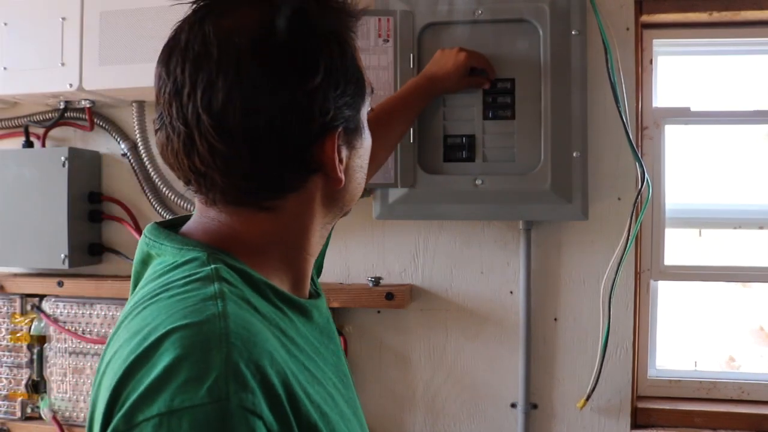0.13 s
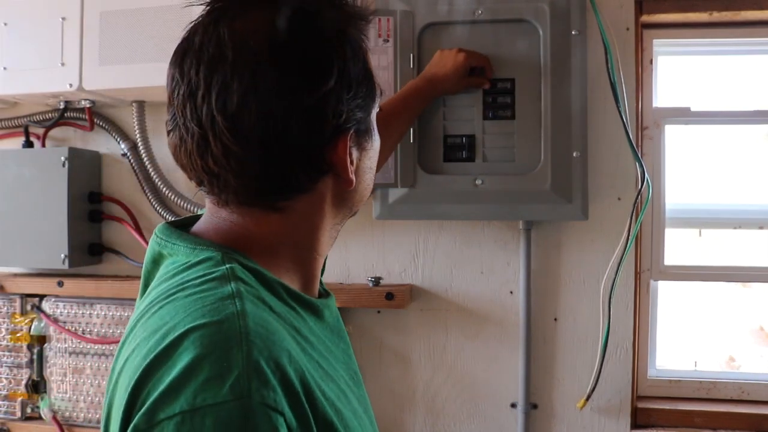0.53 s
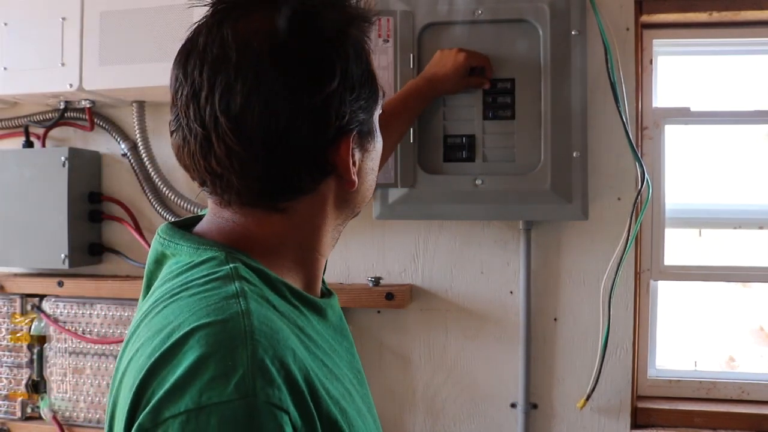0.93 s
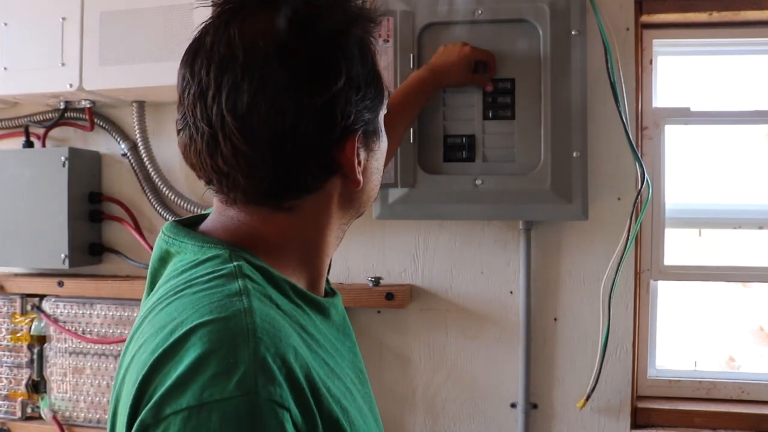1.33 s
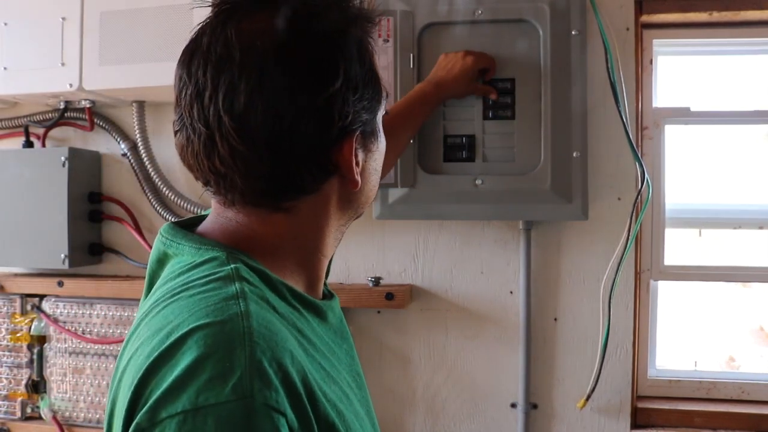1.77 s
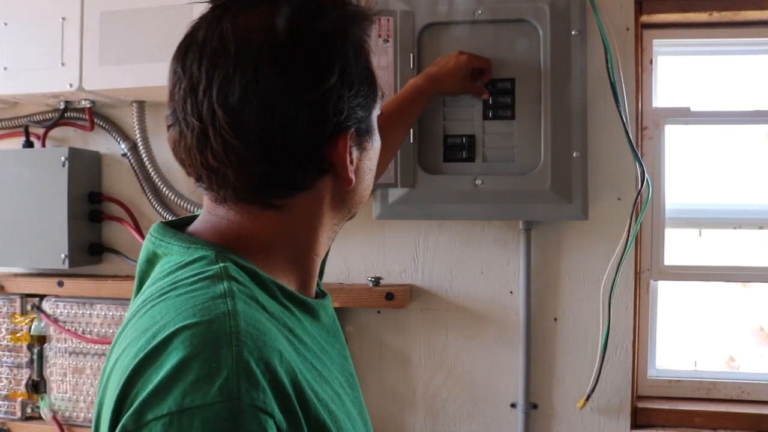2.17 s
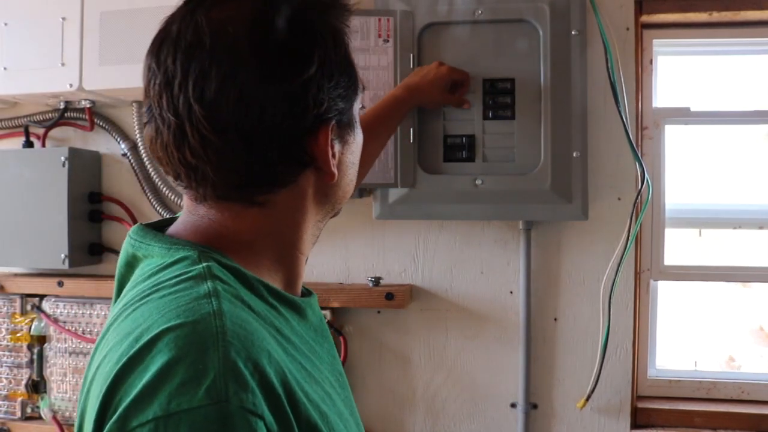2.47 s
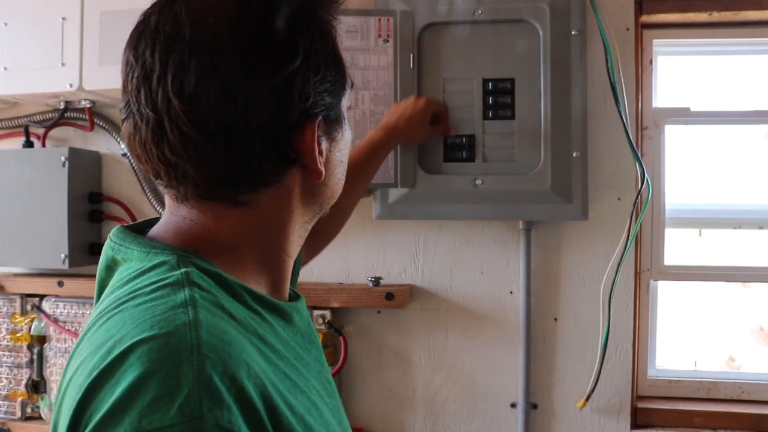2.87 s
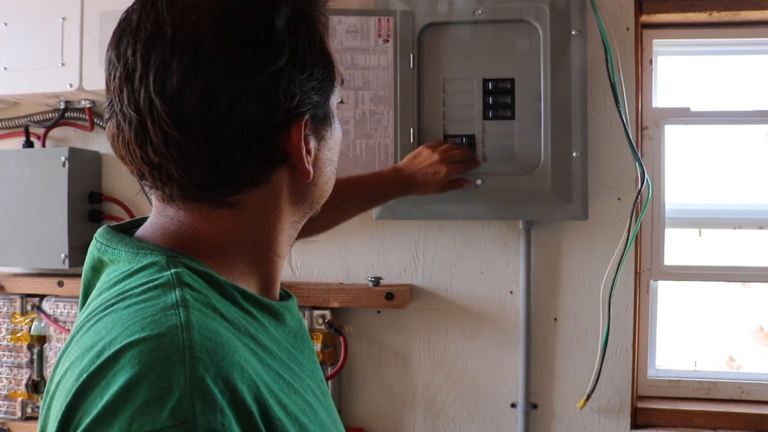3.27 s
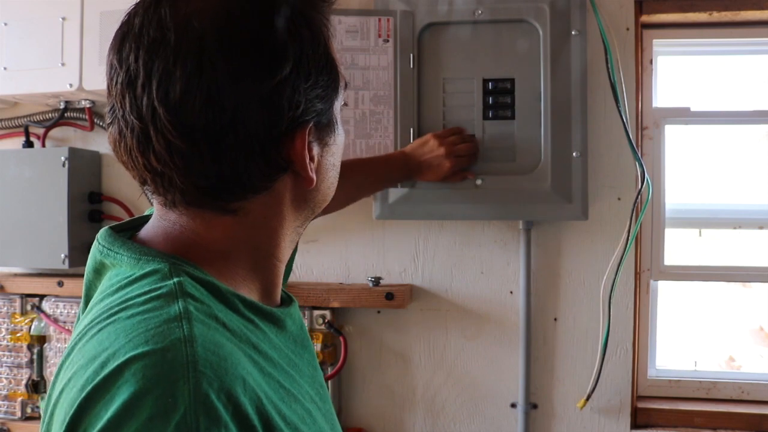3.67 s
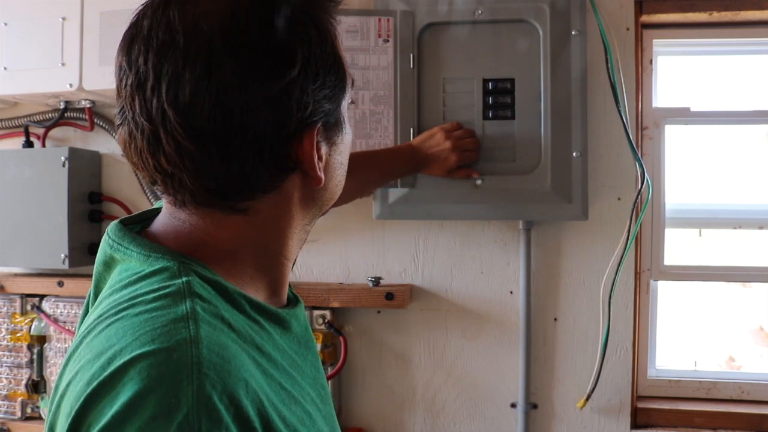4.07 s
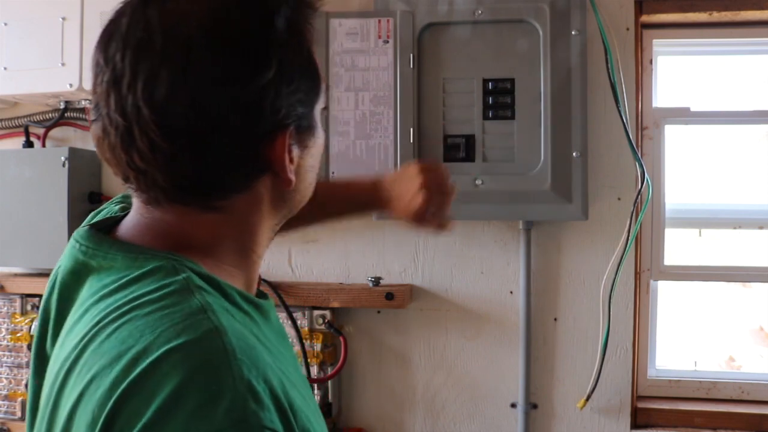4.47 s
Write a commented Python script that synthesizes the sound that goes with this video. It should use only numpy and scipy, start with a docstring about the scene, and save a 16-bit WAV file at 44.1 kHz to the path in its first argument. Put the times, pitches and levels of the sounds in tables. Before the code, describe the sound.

A quiet small shed: low still air, steady microphone hiss and a very faint, wavering high whine. From 0.2 to 0.8 s a sleeve rustles faintly, with a barely audible finger click near 0.4. At about 1.06 s a breaker snaps off, bright and sharp, preceded by a light handle click and followed by a soft hand bump on sheet steel. A second snap, slightly weaker and crisper, comes at 1.76 s. Each rings briefly around the shed, ducking the level before the tail swells back. Quiet follows, with a tiny click near 2.96 s, a very faint bump at 3.5 and more rustling from 3.6. Around 4.0 s small clicks and creaks strain the main handle; at 4.13 s it slams off, by far the loudest, a heavy crack with fast rattling and dull steel thumps until about 4.3. A lighter knock on the panel door lands at 4.59, right at the end.

```python
"""Breakers switched off in a shed

In a small shed, two branch breakers and then the heavy main breaker are snapped off by hand in a steel panel.
Handles, breakers and sheet steel are struck decaying sines with short cracks; noise echoes make the shed ring on.
Still air, a rustling sleeve and a faint whine lie behind; at last the hand knocks the panel door.
The recorder's limiter ducks at each snap and lets the tail swell back over the microphone hiss."""
import sys
import numpy as np
from scipy import signal
from scipy.fft import rfft, irfft, next_fast_len
from scipy.io import wavfile
from scipy.ndimage import uniform_filter1d, minimum_filter1d

SR = 44100
rng = np.random.default_rng(int(sys.argv[2]) if len(sys.argv) > 2 else 0)


def wav_record(signal):
    """Record a signal, one row per channel, as 16-bit PCM in the file named by sys.argv[1]."""
    frames = np.transpose(np.atleast_2d(signal))
    bounded = np.clip(frames, -1, 1)
    # unit amplitude maps onto the largest positive 16-bit level
    quanta = np.round(bounded * 32767).astype(np.int16)
    wavfile.write(sys.argv[1], SR, quanta)


N = 202931
TIME = np.arange(N) / SR
SECOND = TIME[:SR]
CUTOFF_HZ = 15900  # top of the recorder's band


def from_db(db):
    """Decibels to an amplitude factor."""
    return 10 ** (np.asarray(db) / 20)


def rms_one(x):
    """Scale a sound to rms 1."""
    return x / np.sqrt(np.mean(x ** 2) + 1e-20)


def at_hz(points, hz):
    """Read a table on a log-frequency axis."""
    known_hz, values = np.transpose(points)
    return np.interp(np.log(np.maximum(hz, 1)), np.log(known_hz), values)


def add(track, s, sound):
    """Lay a sound into the track at its time in seconds."""
    start = round(s * SR)
    track[start:start + len(sound)] += sound[:N - start]


def dying(t60):
    """One second of exponential decay, losing 60 dB in t60 seconds."""
    return np.exp(-np.log(1000) * SECOND / t60)


def ring(modes):
    """Struck modes: decaying sines, neighbours swinging opposite ways."""
    total = np.zeros(SR)
    for k, (hz, db, t60) in enumerate(modes):
        swing = np.sin(2 * np.pi * hz * SECOND)
        total += (-1) ** k * from_db(db) * dying(t60) * swing
    return total


def soften(x, hz):
    """A softer contact lasts longer and loses its treble: a first-order low-pass."""
    return signal.sosfilt(signal.butter(1, min(hz, CUTOFF_HZ), fs=SR, output="sos"), x)


def noise(spectrum):
    """Steady noise of a given colour, rms 1."""
    size = next_fast_len(N)
    colour = from_db(at_hz(spectrum, np.fft.rfftfreq(size, 1 / SR)))
    white = rng.standard_normal(size)
    return rms_one(irfft(rfft(white) * colour, size)[:N])


def drift(hz):
    """Slow random wandering below a frequency, rms 1."""
    low_pass = signal.butter(2, hz, fs=SR, output="sos")
    slow = signal.sosfilt(low_pass, rng.standard_normal(N + SR))
    return rms_one(slow[SR:])  # the filter has settled by then


# Still air in the shed. Each row: frequency in Hz, relative density in dB per Hz.
AIR_COLOUR = [(25, -20.5), (87, 0), (150, -3.5), (300, -7.5), (600, -6.5), (750, -10.5), (1700, -14.5),
              (3500, -19), (8000, -44.5)]


def still_air(level_db=-60):
    """The quiet of the shed: steady noise, strongest in the bass."""
    return from_db(level_db) * noise(AIR_COLOUR)


# A faint high whine, pitch joined by straight lines. Each row: time in seconds, frequency in Hz.
WHINE_PITCH = [(1.3, 1801), (2.1, 1922)]


def whine(level_db=-69, fade_db_per_s=2, waver_hz=9.2):
    """A thin sine that glides up once, wavers in pitch and fades."""
    pitch_hz = np.interp(TIME, *np.transpose(WHINE_PITCH))
    pitch_hz = pitch_hz + waver_hz * drift(hz=23)
    sine = np.sqrt(2) * np.sin(2 * np.pi * np.cumsum(pitch_hz) / SR)  # rms 1
    return from_db(level_db - fade_db_per_s * TIME) * sine


# Sleeve and fingers sliding. Each row: frequency in Hz, relative density in dB per Hz.
RUSTLE_COLOUR = [(60, -10.5), (250, 7.5), (600, 1.5), (1500, -3.5), (3300, -4), (6000, -20.5), (16000, -46)]
# The arm reaches for the breakers. Each row: start in seconds, end in seconds, level in dB before the unevenness.
REACHES = [(0.197, 0.795, -63), (1.3, 1.699, -65.5), (3.608, 4.6, -62)]


def rustle(rise_db_per_s=42, fall_db_per_s=22.5, uneven_db=3.5):
    """Sliding friction is coloured noise that swells and fades unevenly with each reach of the arm."""
    swells_db = []
    for start, end, db in REACHES:
        before_s, after_s = np.maximum(start - TIME, 0), np.maximum(TIME - end, 0)
        swells_db.append(db - rise_db_per_s * before_s - fall_db_per_s * after_s)
    level_db = np.max(swells_db, axis=0) + uneven_db * drift(hz=12)
    return from_db(level_db) * noise(RUSTLE_COLOUR)


def background():
    """Everything behind the breakers: air, rustle and whine."""
    return still_air() + rustle() + whine()


# Dense ringing of panel, plywood wall and shed. Each row: frequency in Hz, echo gain in dB for what is sent in.
SHED_GAIN = [(40, -19), (90, 2), (180, -1), (320, 9.5), (550, 6), (1000, 9), (2000, 3.5), (3000, 4),
             (5000, 3.5), (9000, -1), (15000, -16.5)]
# How long that ringing lasts. Each row: frequency in Hz, t60 in seconds.
SHED_T60 = [(80, 0.96), (160, 0.38), (300, 0.48), (550, 0.35), (1500, 0.31), (3000, 0.3), (5500, 0.25),
            (9000, 0.2), (14000, .23)]


def shed(x, build_s=0.0013, build_cycles=0.96):
    """Dense echoes die band by band; the lows build up later and mostly last longer."""
    response, edges = np.zeros(SR), np.geomspace(35, 18000, 23)
    white = rng.standard_normal((2, SR))
    for k, (low, high) in enumerate(zip(edges, edges[1:])):
        hz = np.sqrt(low * high)
        band_pass = signal.butter(2, [low, high], "band", fs=SR, output="sos")
        band = signal.sosfilt(band_pass, white[k % 2])
        build_up = 1 - np.exp(-SECOND / (build_s + build_cycles / hz))
        tail = band * dying(at_hz(SHED_T60, hz)) * build_up
        even_gain = np.sqrt(2 * (high - low) / SR / np.sum(tail ** 2))  # energy in step with bandwidth
        response += from_db(at_hz(SHED_GAIN, hz)) * tail * even_gain
    return signal.fftconvolve(x, response)[:N]


# Lasting tones of the steel box, also set off by the breakers.
# Each row: frequency in Hz, level in dB within the ring, t60 in seconds.
BOX = [(113.4, -58, .9), (167.7, -53, .5), (245.8, -48.5, 0.61), (290, -42.5, 0.36), (387.5, -50.5, 0.22),
       (663, -51.5, 0.13), (987, -43.5, 0.28), (1157, -52, 0.2), (1407, -54, 0.35), (1470, -53.5, 0.68)]
# The flexing cover and door. Each row: frequency in Hz, level in dB within the thump, t60 in seconds.
COVER = [(172.9, -20.5, 0.068), (303, -9, 0.031), (430, -4, 0.0087), (524, -8, 0.038), (1000, -7, 0.0057),
         (1660, -9, .02), (2960, -2, 0.027)]
# The hand bumping the sheet steel, also when it follows a handle over.
# Each row: time in seconds, strike level in dB, brightness in Hz.
KNOCKS = [(1.113, -7.5, 1400), (1.139, -14, 700), (3.536, -36.5, 508), (4.0168, -14, 900),
          (4.026, -19, 900), (4.196, 7, 402), (4.255, 2, 292), (4.5925, -10, 2525)]


def knocks(scuff_db=-13, scuff_t60=0.057, box_db=10):
    """The hand thumps the cover and sets the box ringing, with a brief scuff of skin."""
    out = np.zeros(N)
    steel = ring(COVER) + from_db(box_db) * ring(BOX)
    for s, db, bright_hz in KNOCKS:
        scuff = from_db(scuff_db) * rng.standard_normal(SR) * dying(scuff_t60)
        add(out, s, from_db(db) * soften(steel + scuff, bright_hz))
    return out


# A finger presses a handle and it clicks through its slack.
# Each row: time in seconds, ring level in dB, crack in dB against the ring, name of the part that rings.
PRESSES = [(0.37, -45, 9, "handle"), (1.022, -32, 19, "handle"), (1.73, -29.5, 17, "middle"),
           (2.96, -48.5, 15.5, "main"), (3.9755, -33.5, 19.5, "handle"), (4.0152, -32.5, 17, "main")]


def presses(bright_hz=4000):
    """One light click for each press on a handle."""
    for s, db, crack_db, name in PRESSES:
        yield s, db, bright_hz, crack_db, name


def creak(from_s=3.981, to_s=4.009, count=4, level_db=-35, uneven_db=1.5, crack_db=18.5, bright_hz=2500):
    """The stiff main handle is forced over in small slips, unevenly spaced and unevenly strong."""
    gap_s = (to_s - from_s) / count
    for k in range(count):
        s = from_s + gap_s * (k + rng.random())
        db = level_db + uneven_db * rng.standard_normal()
        yield s, db, bright_hz, crack_db, "main"


RATTLE_FROM_S, RATTLE_GAP_S, RATTLE_BRIGHT_HZ = 4.1675, 0.038, 4130
RATTLE_DB, RATTLE_LOSS_DB = 5, 13.5  # first touch; loss per touch
RATTLE_CRACK_DB, RATTLE_DRYING_DB = 22, 4  # first crack against its ring; later touches ring less, tick more
CHATTER_S, CHATTER_LOSS_DB = 0.006, 6  # typical spacing and loss per bounce


def rattle(count=5, size=3, uneven=0.06):
    """The main breaker rattles in its mount: weaker, less regular touches, each chattering a few times."""
    for k in range(count):
        s = RATTLE_FROM_S + RATTLE_GAP_S * k * (1 + uneven * rng.uniform(-1, 1))
        crack_db = RATTLE_CRACK_DB + k * RATTLE_DRYING_DB
        for bounce in range(size):
            db = RATTLE_DB - k * RATTLE_LOSS_DB - bounce * CHATTER_LOSS_DB
            yield s, db, RATTLE_BRIGHT_HZ, crack_db, "main"
            s += CHATTER_S * rng.uniform(0.5, 2)


LATCH_LEAD_S, LATCH_CRACK_DB = 0.0029, 5.5  # the latch lets go just before the snap
REBOUND_S, REBOUND_CRACK_DB = 0.005, 8.5  # the contact arm bounces once off its stop
# A breaker snaps off. Each row: time in seconds, snap level in dB, brightness in Hz, crack in dB against the ring,
# latch in dB against the snap, rebound in dB against the snap, name of the breaker.
FLIPS = [(1.0641, 3, 11800, 12.5, -16, -12, "upper"), (1.7615, -1.5, 13000, 17, -17, -6, "middle"),
         (4.1323, 18.5, 4500, 12.5, -41, -3, "main")]


def flips():
    """The latch lets go, the spring slams the contacts open and the arm rebounds."""
    for s, db, bright_hz, crack_db, latch_db, rebound_db, name in FLIPS:
        yield s - LATCH_LEAD_S, db + latch_db, bright_hz, LATCH_CRACK_DB, name
        yield s, db, bright_hz, crack_db, name
        yield s + REBOUND_S, db + rebound_db, bright_hz, REBOUND_CRACK_DB, name


def crack(order=6, scatter=0.55, longest_s=0.0005):
    """A click bouncing about inside a small case: all pitches alike, smeared over a few milliseconds."""
    x = signal.unit_impulse(SR // 10)
    lags = np.ceil(rng.uniform(0.14, 1, order) * longest_s * SR).astype(int)
    for lag in lags:
        loop = np.r_[1, np.zeros(lag - 1), -scatter]
        x = signal.lfilter(loop[::-1], loop, x)  # all-pass echo
    return x


# What a plastic handle and each breaker ring with, by name, mount and case first, thin springs last.
# Each row: frequency in Hz, level in dB within the ring, t60 in seconds.
BREAKERS = { "handle": [(550, -15.5, .04), (1300, -11.5, 0.044), (2650, -6.5, 0.0083), (3400, -7, 0.011),
            (3850, -4, 0.026), (4550, -2.5, .01)], "upper": [(87.7, -45.5, 0.95), (185, -25, .06),
            (298.6, -30, 0.087), (1328, -29, 0.089), (2980, -5.5, .021), (3235, -11.5, 0.024),
            (3580, -16, 0.021), (4726, -7.5, .008), (5444, -13.5, 0.011), (9400, -8, 0.0045),
            (2750, -38.5, 0.42), (9400, -54.5, .42)], "middle": [(91.3, -44.5, 2.3), (330, -26.5, 0.055),
            (476.7, -24, 0.022), (1452, -24.5, 0.17), (2280, -13, 0.011), (2910, -5.5, 0.032),
            (3400, -3.5, 0.0059), (3556, -8.5, 0.034), (4610, -13, 0.0092), (5540, -6.5, 0.011),
            (8380, -3.5, 0.0034), (2920, -35.5, 0.44), (5550, -43.5, 0.26), (6799, -48.5, 0.6)],
            "main": [(123, -31.5, 0.2), (171, -28, 0.15), (239, -22.5, 0.087), (279, -21.5, 0.11),
            (1320, -19.5, 0.0093), (2036, -23, 0.018), (2638, -10.5, 0.029), (3129, -4, 0.015),
            (3484, -7, 0.014), (4620, -6, 0.0077), (5570, -5.5, 0.0034), (6330, -13.5, 0.0039)]}


def breakers():
    """Each contact rings its breaker and the steel box, and gives a short crack."""
    rings, cracks, box = np.zeros(N), np.zeros(N), ring(BOX)
    voices = {name: ring(modes) + box for name, modes in BREAKERS.items()}
    contacts = [*flips(), *presses(), *creak(), *rattle()]
    for s, db, bright_hz, crack_db, name in contacts:
        add(rings, s, from_db(db) * soften(voices[name], bright_hz))
        add(cracks, s, from_db(db + crack_db) * soften(crack(), bright_hz))
    return rings, cracks


def scene(knock_room_db=-9, case_cut_hz=400, crack_room_db=-0.5, ring_room_db=0.0,
          ring_direct_db=4, crack_direct_db=-4.0):
    """The small cases face the microphone but radiate little bass; rings and cracks reach the shed separately."""
    rings, cracks = breakers()
    bumps = knocks()
    direct = from_db(ring_direct_db) * rings + from_db(crack_direct_db) * cracks
    direct = signal.sosfilt(signal.butter(1, case_cut_hz, "high", fs=SR, output="sos"), direct)
    ring_echoes = shed(from_db(ring_room_db) * rings)
    crack_echoes = shed(from_db(crack_room_db) * cracks + from_db(knock_room_db) * bumps)
    sound = direct + bumps + ring_echoes + crack_echoes + background()
    return np.array([sound, sound])


def limiter(x, threshold_db=-8, release_db_per_s=150, attack_s=0.0066):
    """The gain drops within milliseconds of a peak and creeps back at a steady rate in dB."""
    level_db = 20 * np.log10(np.abs(x).max(axis=0) + 1e-9)
    over_db = np.maximum(level_db - threshold_db, 0)
    release_db = release_db_per_s * TIME
    held_db = np.maximum.accumulate(over_db + release_db) - release_db
    r = np.exp(-1 / (attack_s * SR))
    cut_db = signal.lfilter([1 - r], [1, -r], held_db)
    return x * from_db(-cut_db)


def peak_guard(x, size=9):
    """A second, instant limiter holds the first cycles of a snap at full scale without squaring them off."""
    room_left = 1 / np.maximum(np.abs(x).max(axis=0), 1)
    return x * uniform_filter1d(minimum_filter1d(room_left, size), size)


# Hiss of the microphone amplifiers. Each row: frequency in Hz, relative density in dB per Hz.
HISS_COLOUR = [(15, -42.5), (25, -4), (80, -3.5), (141, -4.5), (962, -7), (3820, -4.5), (14400, -5.5),
               (16000, -6.5)]


def record(dry, hiss_db=-58.5):
    """Two limiters, each channel's own hiss, then a steep cut of the top."""
    limited = peak_guard(limiter(dry))
    hiss = from_db(hiss_db) * np.array([noise(HISS_COLOUR), noise(HISS_COLOUR)])
    top_cut = signal.ellip(10, 0.1, 70, CUTOFF_HZ, fs=SR, output="sos")
    return signal.sosfilt(top_cut, limited + hiss)


dry = scene()
out = record(dry)
wav_record(out)
```